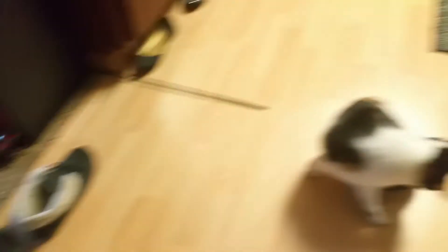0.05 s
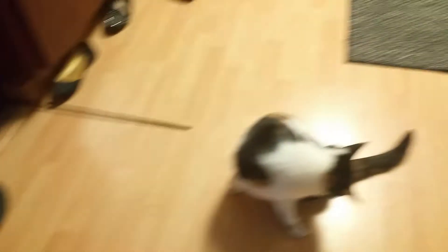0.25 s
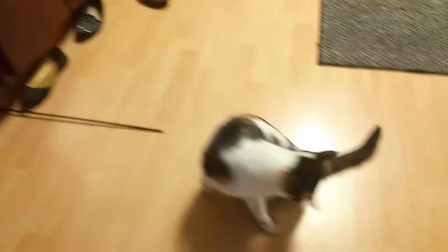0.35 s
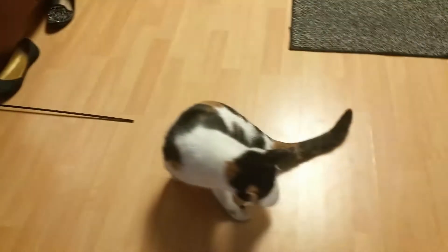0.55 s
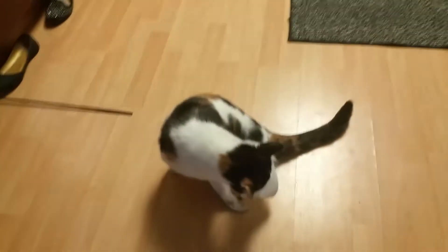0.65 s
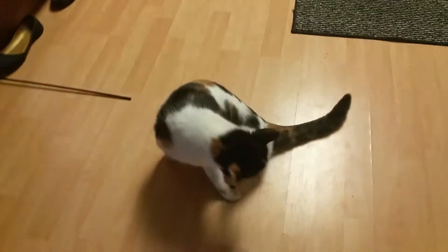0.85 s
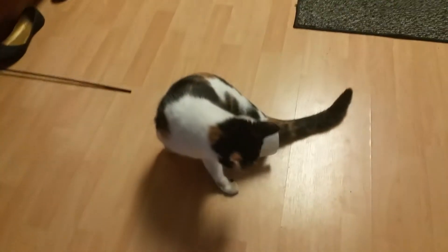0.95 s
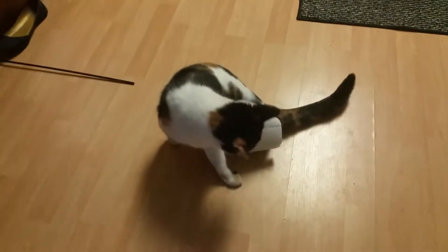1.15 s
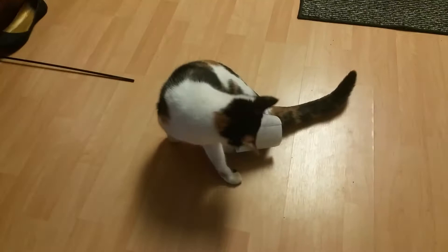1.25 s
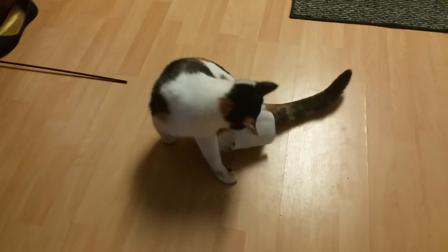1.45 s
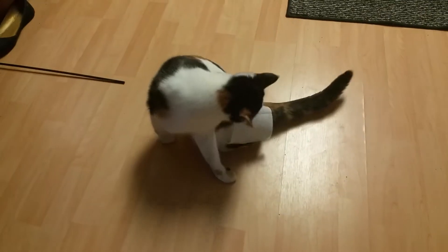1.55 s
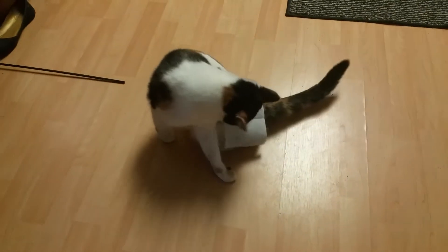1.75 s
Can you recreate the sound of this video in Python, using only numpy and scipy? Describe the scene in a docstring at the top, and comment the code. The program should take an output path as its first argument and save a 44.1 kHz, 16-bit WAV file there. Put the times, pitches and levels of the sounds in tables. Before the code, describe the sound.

A cat scuffles with paper, its paws thumping and tapping on wooden boards.

```python
"""A cat wrestles with a piece of paper on a wooden floor in a quiet room.
First the paper crackles and a paw knocks hard on the boards, making them ring. Next the sheet
slides once with a long swish, among softer thumps. Light taps and crackles follow, then two
more hard knocks and a few last soft bumps. Knocks, crackles and swish echo briefly in the room.
Underneath, paper brushes faintly on fur, paws scuff the floor and the room hums with soft noise."""
import sys
import numpy as np
from scipy import signal
from scipy.fft import rfft, irfft
from scipy.io import wavfile

SR = 44100
rng = np.random.default_rng(int(sys.argv[2]) if len(sys.argv) > 2 else 0)


def digitize_waveform(pressure):
    """Quantize a signal to 16-bit integers and store it at the path in sys.argv[1].

    Rows of a 2-D input are taken as channels; values are limited to [-1, 1].
    """
    field = np.atleast_2d(pressure).T
    bounded = np.clip(field, -1, 1)
    quanta = np.round(bounded * 32767).astype(np.int16)
    wavfile.write(sys.argv[1], SR, quanta)


N = 79380
TIME = np.arange(N) / SR

# Paws hitting the floor. A larger width makes a knock die sooner.
# start_s, peak_db, pitch_hz, width_hz, low_edge_hz, top_edge_hz, to_boards_db, to_room_db
PAW_KNOCKS = [(0.2194, -24, 520, 242, 246, 1910, -3.5, -2), (0.2788, -40.5, 574, 151, 300, 1510, -19, -18),
              (0.3143, -38, 620, 217, 420, 2000, -15, -14), (0.3918, -36, 440, 403, 198, 1000, -10, 0),
              (0.4068, -42, 124, 66, 70.6, 406, -7, -4), (0.4225, -36, 564, 506, 276, 3570, -19, -14),
              (0.434, -43.5, 393, 300, 204, 1480, -8, -15), (0.495, -48.5, 125, 69, 70, 397, -16, -19),
              (0.691, -49.5, 604, 250, 298, 1460, -4, -29), (0.8034, -45, 800, 300, 355, 1520, -7, 7.5),
              (0.8089, -41.5, 467, 157, 252, 1820, -5, 0), (0.884, -46, 776, 200, 400, 1600, -3.5, -5),
              (0.9405, -48.5, 780, 600, 450, 4500, -3, -2),
              (1.174, -24.5, 610, 527, 265, 3080, -15.5, -3.5),
              (1.18, -45.5, 159, 60.3, 79.3, 400, -2, -6.5), (1.209, -43, 167, 73.3, 80, 700, -14, -10.5),
              (1.406, -26, 408, 733, 206, 1460, -9, 0), (1.414, -31.5, 221, 106, 143, 880, -17, -9.5),
              (1.5, -44, 189, 59.2, 128, 600, -1.5, -10), (1.561, -58, 90, 40, 50, 298, -10, -14)]
# The notes the floorboards ring with: pitch_hz, level_db, fade_by_60_db_s
BOARD_NOTES = [(118.4, -9, 0.44), (168.2, -2.5, 0.28), (234.9, -9.5, 0.65), (319, -22, 0.52),
               (368, -39, 0.16), (460, 2.5, 0.21), (580, 3.5, 0.16), (657.4, 3, 0.5), (736, -24, 0.33),
               (937, -29, 0.34), (1115, -24, .2), (1360, -17, .2)]

# Paper crackles. More tilt is brighter: start_s, length_s, level_db, tilt_db_per_octave, top_edge_hz
PAPER_CRACKLES = [(0.1947, 0.019, -44, -1.87, 8800), (0.198, 0.01, -52, 9, 12600),
                  (0.2207, 0.0024, -39.5, 3.5, 7650), (0.312, 0.0082, -46, 1, 13900),
                  (0.319, 0.013, -41, 6.5, 5100), (0.424, 0.013, -45.5, 1.5, 3860),
                  (0.807, 0.051, -65.5, 6, 5000), (0.835, 0.0098, -63, 14, 13000),
                  (0.878, 0.019, -60, 1, 13000), (0.937, 0.0036, -49.5, 3, 4400),
                  (1.172, 0.006, -39, 6.5, 4050)]
# Tone of a crackle, meaning its balance of low and high sound: frequency_hz, level_db
CRACKLE_TONE = [(100, -2), (400, 1.5), (750, 9), (1300, 2.5), (2000, 1.5), (3800, -11), (6500, -15),
                (9000, -16.5), (12500, -16), (16000, -22.5)]
# Loudness of the sliding paper: time_s, level_db
SLIDE_LOUDNESS = [(0.37, -80), (0.405, -58.5), (0.43, -46), (0.455, -43), (0.49, -43), (0.53, -46.5),
                  (0.575, -47.5), (0.62, -66), (0.66, -61), (0.72, -79)]
# Tone of the sliding paper: frequency_hz, level_db
SLIDE_TONE = [(60, -10), (150, -1.5), (300, -1), (650, 7), (1300, 1.5), (2000, 2), (3000, -9), (4500, -7.5),
              (5500, -16.5), (6500, -10), (7800, -15.5), (9500, -10), (12000, -3), (14000, -10.5),
              (16000, -11)]
# Which ear hears more of the paper: frequency_hz, left_minus_right_db
PAPER_BALANCE = [(100, 0), (2400, -0.5), (4400, -4.5), (8000, -2.5), (11000, -19), (16000, 4)]

# Loudness of paper brushing on fur: time_s, level_db
BRUSH_LOUDNESS = [(0, -71), (0.16, -68.5), (0.38, -67), (0.68, -64.5), (0.77, -73.5), (0.84, -70),
                  (0.93, -68.5), (0.97, -79.5), (1.01, -72), (1.035, -66.5), (1.17, -64.5), (1.27, -68),
                  (1.33, -65), (1.39, -79.5), (1.51, -78), (1.56, -72), (1.6, -71.5), (1.63, -100),
                  (1.74, -99), (1.775, -71), (1.8, -71)]
# Tone of the brushing: frequency_hz, level_db
BRUSH_TONE = [(300, -18), (2000, 11.5), (4500, 9), (8000, 5.5), (10500, 13), (12500, 12), (16000, 4.5)]
# Loudness of paws scuffing the boards: time_s, level_db
SCUFF_LOUDNESS = [(0, -66), (0.18, -64), (0.6, -59), (0.75, -61.5), (0.92, -59.5), (1.02, -69),
                  (1.48, -63.5), (1.55, -57.5), (1.62, -62.5), (1.8, -66)]
# Tone of the scuffing: frequency_hz, level_db
SCUFF_TONE = [(150, 0), (700, -4.5), (1300, -6), (1950, -3.5), (2600, -23.5), (5000, -30), (16000, -37)]

# How long the room's echo lasts: frequency_hz, fade_by_60_db_s
ECHO_FADE = [(100, .55), (500, 0.42), (1500, 0.46), (4000, 0.37), (8000, 0.23), (15000, 0.02)]
# Tone of the echo: frequency_hz, level_db
ECHO_TONE = [(60, -15.5), (150, 6), (400, -3), (700, 3), (1300, 0.5), (3500, 7), (7000, 3), (14000, 2.5)]
# How alike the sound is in the two ears: frequency_hz, likeness_0_to_1
EAR_LIKENESS = [(60, 0.805), (130, 0.89), (290, 0.859), (640, 0.59), (1400, 0.031), (3000, 0.21),
                (7000, 0.093)]
# Tone of the steady room noise: frequency_hz, level_db
ROOM_NOISE_TONE = [(15, -50), (25, -23), (66, -5.5), (110, 2.5), (145, -2.5), (180, 1), (240, 2.5),
                   (300, -2), (420, -10.5), (540, -11.5), (640, 1), (760, -10), (1050, -17), (2000, -34),
                   (2600, -19.5), (4300, -27.5), (6500, -30.5), (8400, -30.5), (10400, -29), (15500, -27.5)]


def paw_knocks():
    """Each blow makes the floor swing and quickly stop; the boards and the room ring on."""
    clack_hz, clack_width_hz, clack_db = 1175, 140, -1  # a short, higher ring of the planks
    clack_filter = signal.iirpeak(clack_hz, clack_hz / clack_width_hz, fs=SR)
    t = TIME[:SR // 2]
    direct, to_boards, to_room = np.zeros((3, N))
    for start_s, peak_db, pitch_hz, width_hz, low_hz, top_hz, boards_db, room_db in PAW_KNOCKS:
        swing = -np.exp(-np.pi * width_hz * t) * np.sin(2 * np.pi * pitch_hz * t)
        swing = signal.lfilter(*signal.butter(3, low_hz, "high", fs=SR), swing)
        swing = swing + gain(clack_db) * signal.lfilter(*clack_filter, swing)
        swing = cut_treble(swing, top_hz, order=4)
        swing *= gain(peak_db) / abs(swing).max()
        add(direct, start_s, swing)
        add(to_boards, start_s, swing * gain(boards_db))
        add(to_room, start_s, swing * gain(room_db))
    ring = board_ring(to_boards)
    return direct + ring + room_echo(to_room + gain(-8.5) * ring[0])


def board_ring(blows):
    """Struck boards ring with several notes, each fading at its own speed."""
    t = TIME[:SR // 2]
    notes = sum(gain(level_db) * np.exp(-np.log(1000) * t / fade_s) * np.cos(2 * np.pi * pitch_hz * t)
                for pitch_hz, level_db, fade_s in BOARD_NOTES)
    return gain(-49) * convolve(blows, notes)


def paper_crackles():
    """Paper gives off short clumps of snaps as it buckles or is slapped."""
    release_s = 0.0019
    t = TIME[:SR // 8]
    crackles = np.zeros((2, N))
    for start_s, length_s, level_db, tilt_db, top_hz in PAPER_CRACKLES:
        hold_then_fade = np.exp(-np.maximum(t - length_s, 0) / release_s)
        clump = snaps(per_s=2500, spread_db=2.5)[:, :len(t)] * hold_then_fade
        clump = unit(clump) * np.sqrt(length_s / t[-1])  # longer clumps carry more energy
        clump = paper_tone(clump, CRACKLE_TONE, tilt_db)
        add(crackles, start_s, gain(level_db) * cut_treble(clump, top_hz, order=6))
    return crackles + gain(-2) * room_echo(crackles)


def paper_slide():
    """The dragged sheet rubs in snaps so dense that they blur into one swish."""
    friction = paper_flexing(snaps(per_s=12000, spread_db=3))
    swish = paper_tone(friction, SLIDE_TONE) * loudness(SLIDE_LOUDNESS)
    return swish + gain(-2) * room_echo(swish)


def paper_flexing(sound):
    """As paper bends, random patches of its tone grow stronger or weaker."""
    patch_hz, patch_s, patch_db = 314, 0.02, 4
    hz, t, spectrum = signal.stft(sound, SR, nperseg=512, noverlap=384)
    patches = rng.standard_normal(spectrum.shape)
    for axis, step in ((1, hz[1] / patch_hz), (2, t[1] / patch_s)):  # smooth over pitch, then time
        patches = signal.lfilter([1], [1, -np.exp(-2 * step)], patches, axis)
    spectrum = spectrum * unit(gain(patch_db * unit(patches)))
    return signal.istft(spectrum, SR, nperseg=512, noverlap=384)[1][:, :N]


def fur_brushing():
    """Paper rubs on fur with a faint, high hiss."""
    return paper_tone(snaps(per_s=9000, spread_db=-3), BRUSH_TONE) * loudness(BRUSH_LOUDNESS)


def paw_scuffing():
    """Paws rub on the boards with a duller sound."""
    friction = to_ears(snaps(per_s=3000, spread_db=0))
    return shape_tone(friction, SCUFF_TONE) * loudness(SCUFF_LOUDNESS)


def room_echo(sound):
    """Many reflections blend into a short tail whose treble dies first."""
    gap_s, early_db, early_s = 0.002, 1.5, 0.011  # first reflections: delay, boost, fading time
    reflections = rng.choice([-1., 1.], (2, SR)) * (rng.random(SR) < .15)
    hz, t, spectrum = signal.stft(to_ears(unit(reflections)), SR, nperseg=256)
    fade_rate = np.log(1000) / look_up(ECHO_FADE, hz)[:, None]
    fade = np.exp(-fade_rate * t) * np.sqrt(2 * fade_rate / SR)  # same energy, long or short
    spectrum = spectrum * fade * gain(look_up(ECHO_TONE, hz))[:, None]
    tail = signal.istft(spectrum, SR, nperseg=256)[1][:, :SR]
    early_boost = gain(early_db * np.exp(-TIME[:SR] / early_s))
    fade_in = np.clip(TIME[:SR] / gap_s - .5, 0, 1)
    return convolve(sound, tail * early_boost * fade_in)


def room_noise():
    """The steady, mostly low noise of a quiet room."""
    return gain(-60.5) * shape_tone(to_ears(rng.standard_normal((2, N))), ROOM_NOISE_TONE)


def snaps(per_s, spread_db):
    """Two channels of tiny clicks at random times; a spread of 0 makes them all one size."""
    sizes = gain(spread_db * np.minimum(rng.exponential(1, N), 4))
    happens = rng.random(N) < per_s / SR
    return unit(sizes * happens * rng.choice([-1., 1.], (2, N)))


def paper_tone(pair, table, tilt_db=0):
    """Gives snaps the tone of paper and places them mostly to the right."""
    left, right = to_ears(pair)
    return np.vstack([shape_tone(left, table, tilt_db, side=1),
                      shape_tone(right, table, tilt_db, side=-1)])


def shape_tone(sound, table, tilt_db=0, side=0):
    """Filters by a tone table; side 1 or -1 gives the left or right ear's share of the paper."""
    hz = abs(np.fft.fftfreq(2048, 1 / SR))
    curve = unit(gain(look_up(table, hz) + tilt_db * np.log2(hz / 2000 + .05)))
    if side:
        curve = curve * np.sqrt(2 / (1 + gain(-side * look_up(PAPER_BALANCE, hz)) ** 2))
    # Build the filter so that it rings after a click, never before it.
    spectrum = np.exp(np.conj(signal.hilbert(np.log(curve + 1e-6))))
    response = np.fft.ifft(spectrum).real
    return convolve(sound, response[:len(hz) // 2])


def to_ears(pair):
    """Blends two unrelated signals so that both ears hear nearly the same bass."""
    first, second = rfft(pair)
    likeness = look_up(EAR_LIKENESS, np.fft.rfftfreq(pair.shape[1], 1 / SR))
    angle = np.arccos(np.clip(likeness, -1, 1)) / 2
    shared, opposite = first * np.cos(angle), second * np.sin(angle)
    return irfft([shared + opposite, shared - opposite], pair.shape[1])


def cut_treble(sound, top_hz, order):
    """Softens everything above top_hz; a higher order cuts more steeply."""
    return signal.sosfilt(signal.butter(order, top_hz, fs=SR, output="sos"), sound)


def convolve(sound, response):
    """Makes every sample of the sound set off a copy of the response."""
    return signal.fftconvolve(np.atleast_2d(sound), np.atleast_2d(response), axes=1)[:, :N]


def gain(db):
    """Turns decibels into a number to multiply by."""
    return 10 ** (np.asarray(db) / 20)


def unit(x):
    """Scales to an average strength (rms) of 1."""
    return x / np.sqrt(np.mean(x ** 2) + 1e-20)


def look_up(table, hz):
    """Reads between a table's rows, with octaves evenly spaced."""
    row_hz, values = np.transpose(table)
    return np.interp(np.log(hz + 1), np.log(row_hz), values)


def loudness(table):
    """Turns a loudness table into a gain for every sample."""
    return gain(np.interp(TIME, *np.transpose(table)))


def add(mix, start_s, sound):
    """Mixes a sound in at its start time."""
    part = mix[..., round(start_s * SR):][..., :sound.shape[-1]]
    part += sound[..., :part.shape[-1]]


def scene():
    """Cat, paper and room together."""
    foreground = paw_knocks() + paper_crackles() + paper_slide()
    return foreground + fur_brushing() + paw_scuffing() + room_noise()


def record(dry):
    """Removes the very highest treble."""
    top_hz = 15780
    treble_filter = signal.firwin(511, top_hz, window=("kaiser", 9), fs=SR)
    return signal.oaconvolve(dry, treble_filter[None], "same")


dry = scene()
out = record(dry)
digitize_waveform(out)
```